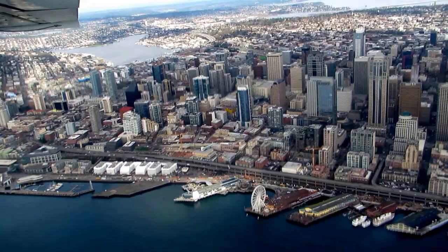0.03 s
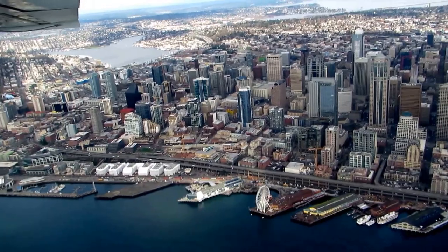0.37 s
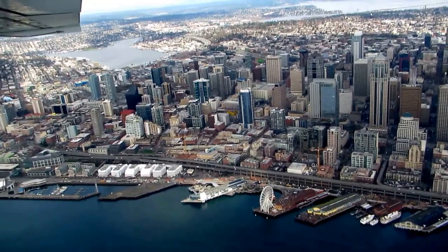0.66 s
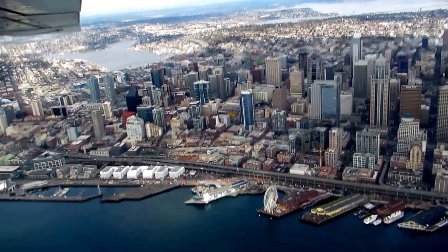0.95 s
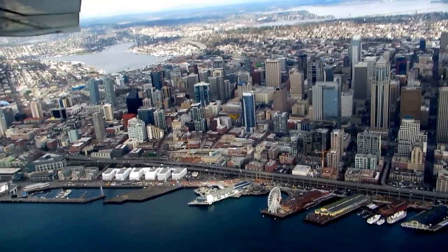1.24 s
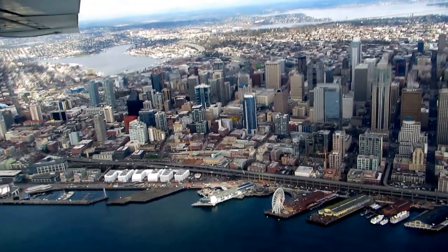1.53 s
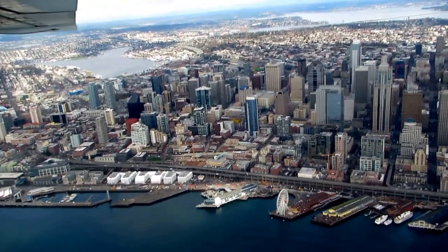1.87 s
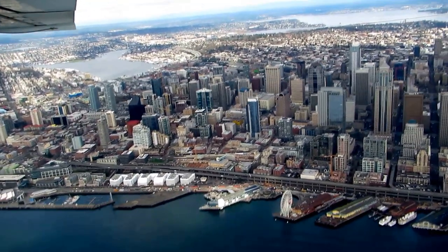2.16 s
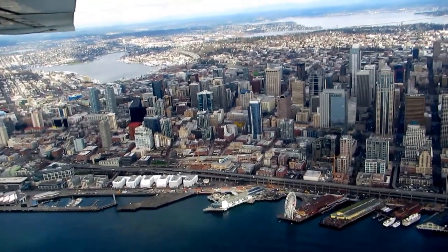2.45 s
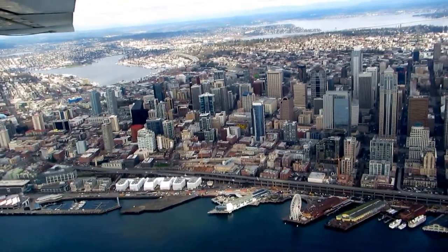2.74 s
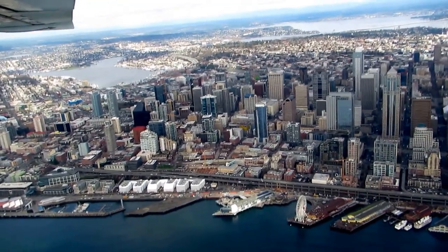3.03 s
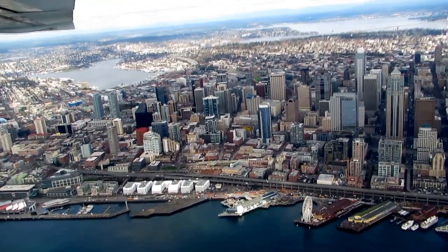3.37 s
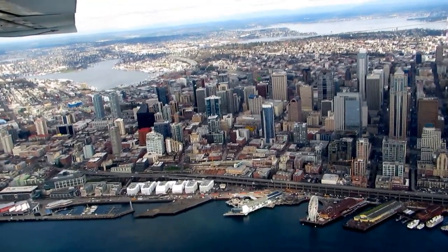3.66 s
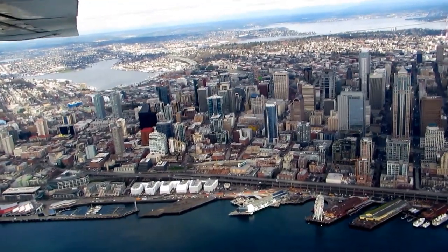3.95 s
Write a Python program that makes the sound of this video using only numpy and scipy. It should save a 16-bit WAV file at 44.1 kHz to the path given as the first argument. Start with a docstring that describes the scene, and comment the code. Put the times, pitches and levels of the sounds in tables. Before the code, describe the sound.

The steady, deep drone of a piston engine and propeller fills the cabin of a small cruising aircraft. The microphone is inside, where the walls rumble and air streams faintly past the windows, unchanged throughout.

```python
"""A steady, deep drone over a low rumble and a rush of air: the inside of a small cruising seaplane.
The drone comes from a six-cylinder piston engine and its propeller, turning at nearly constant speed.
The cabin walls rumble as the cylinders fire, and air streams past the windows.
A narrow band of middle pitches and the very highest treble are missing from the sound."""
import sys
import numpy as np
from scipy import signal
from scipy.fft import rfft, irfft
from scipy.io import wavfile
from scipy.ndimage import uniform_filter1d

SR = 44100
rng = np.random.default_rng(int(sys.argv[2]) if len(sys.argv) > 2 else 0)


def wrap_up_sound(samples):
    """Save the sound to the file named by the first command line argument, as 16-bit audio."""
    columns = np.atleast_2d(samples).T
    # keep every value between -1 and 1, then stretch to whole-number steps
    tamed = np.clip(columns, -1, 1)
    steps = np.round(tamed * 32767).astype(np.int16)
    wavfile.write(sys.argv[1], SR, steps)


N = 176400
CYLINDERS = 6


def gain(db):
    """Turn decibels into a number to multiply a sound by."""
    return 10 ** (np.asarray(db) / 20)


def curve(rows):
    """Join (time, value) points with straight lines, giving one value per sample."""
    return np.interp(np.arange(N) / SR, *np.array(rows).T)


def wander(per_s):
    """A smooth random drift, about 1 in size, that heads for a new value per_s times a second."""
    size = int(SR / per_s)
    steps = np.repeat(rng.standard_normal(N // size + 1), size)
    smooth = uniform_filter1d(uniform_filter1d(steps, size), size)[:N]
    return smooth / smooth.std()


def shaped_noise(spectrum):
    """Noise that follows a table of (frequency, level) and fades steeply beyond both ends."""
    hz, db = np.array(spectrum).T
    bin_hz = np.maximum(np.arange(N // 2 + 1) * SR / N, 1)
    edge_fade = (np.minimum(bin_hz / hz[0], 1) * np.minimum(hz[-1] / bin_hz, 1)) ** 6
    shape = gain(np.interp(np.log(bin_hz), np.log(hz), db)) * edge_fade
    return irfft(rfft(rng.standard_normal(N)) * shape, N) * np.sqrt(SR / 2)


def engine_drone(cycle_phase, cycle_hz):
    """Exhaust and propeller pulses repeat in step with the engine, making a stack of tones."""
    # Tones of the drone (3 = one row of cylinders, 6 = every firing): vibrations per cycle, level/dB
    tones = [(1, -49), (3, -32), (6, -21), (9, -22.5), (12, -24), (15, -36), (17, -41.5), (18, -27),
             (22, -44.5), (24, -48.5), (27, -46), (29, -46.5), (30, -48), (35, -55.5), (36, -53)]
    # Slow rise and fall of the firing tone: t/s, level/dB
    firing_swell = [(0, 0), (.4, -1), (.9, 0.5), (1.4, 0.5), (2.0, -1), (2.5, -1.7), (3.1, 0), (4, 0.8)]
    delay_s, delay_at_hz = 0.0202, 300  # the cabin smears each pulse: higher tones arrive later
    drone = np.zeros(N)
    for multiple, level_db in tones:
        swell_db = curve(firing_swell) if multiple == CYLINDERS else 0
        waver_db = 0.23 * wander(per_s=6.11)
        phase_lag = np.pi * delay_s * (multiple * cycle_hz) ** 2 / delay_at_hz
        drone -= gain(level_db + swell_db + waver_db) * np.cos(multiple * cycle_phase - phase_lag)
    return np.sqrt(2) * gain(0.17) * drone


def cabin_rumble(firing_phase):
    """The cabin walls rumble, throbbing with each firing and shaken by the air outside."""
    # Strength of the rumble from low to high pitch: f/Hz, level/dB
    spectrum = [(12, -77.2), (25, -62.3), (45, -54.9), (100, -48.9), (165, -45.6), (260, -51.0),
                (400, -54.4), (530, -57.7), (620, -63.0), (720, -69.0), (800, -77)]
    # Rise and fall of the rumble: t/s, level/dB
    swell = [(0, 2), (.2, -2.8), (.55, -0.3), (.9, 0.1), (1.1, 0), (1.9, -0.4), (2.65, 0.3), (3.0, -1),
             (3.38, -0.5), (3.6, 0.8), (4, 1.7)]
    shake_db = 0.3 * wander(per_s=5)
    throb = 1 + 0.08 * np.cos(firing_phase)
    return shaped_noise(spectrum) * gain(0.3 + curve(swell) + shake_db) * throb


def air_rush(firing_phase):
    """Air rushes along the windows and door seals, faintly pulsed by the propeller."""
    # Strength of the rush from low to high pitch: f/Hz, level/dB
    spectrum = [(800, -77.5), (880, -73), (960, -69), (1280, -69), (1600, -71), (1930, -70), (2080, -67),
                (2330, -71), (2520, -77), (2900, -81.8), (3500, -81.5), (3900, -79.5), (4700, -78),
                (6100, -82.6), (6850, -83), (8200, -92.3), (10300, -96.3), (13000, -104.2), (15600, -113.5)]
    # Rise and fall of the airflow: t/s, level/dB
    flow = [(0, -1), (.25, -2.7), (1.3, -1), (2.2, -1.5), (2.55, -0.5), (2.95, -2), (3.35, -1.5),
            (3.7, -0.5), (4, -0.5)]
    flutter_db = 0.16 * wander(per_s=11)
    throb = 1 + 0.02 * np.cos(firing_phase)
    return shaped_noise(spectrum) * gain(1.42 + curve(flow) + flutter_db) * throb


def scene():
    """The turning engine sets the pitch of the drone and the throb of the rumble and the rush."""
    # Engine speed: t/s, speed/(turns per minute)
    engine_speed = [(0.0, 2426.5), (1.0, 2427.3), (1.7, 2427.9), (2.2, 2422.9), (2.6, 2422.3),
                    (3.3, 2427.9), (4.0, 2425.4)]
    cycle_hz = curve(engine_speed) / 120  # in one cycle of two turns, each cylinder fires once
    wobble = 1 + 0.00064 * wander(per_s=14)  # uneven burning of fuel shakes the engine shaft
    cycle_phase = 2 * np.pi * np.cumsum(cycle_hz * wobble) / SR
    firing_phase = CYLINDERS * cycle_phase
    drone = engine_drone(cycle_phase, cycle_hz.mean())
    return (drone + cabin_rumble(firing_phase) + air_rush(firing_phase))[None]


def record(dry):
    """Cut out one narrow band of middle pitches (a notch), then the highest treble."""
    notch_hz, width_hz, top_hz = 1106, 40, 15700
    notch = signal.iirnotch(notch_hz, notch_hz / width_hz, fs=SR)
    treble_cut = signal.ellip(10, 0.1, 80, top_hz, fs=SR, output="sos")
    return signal.sosfilt(treble_cut, signal.lfilter(*notch, dry))


dry = scene()
out = record(dry)
wrap_up_sound(out)
```